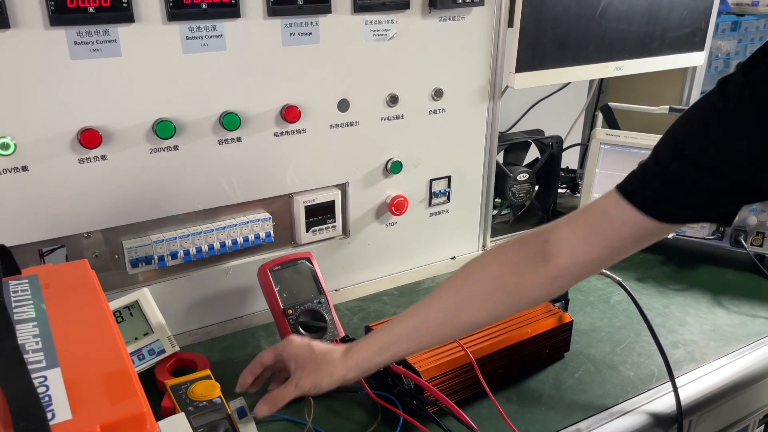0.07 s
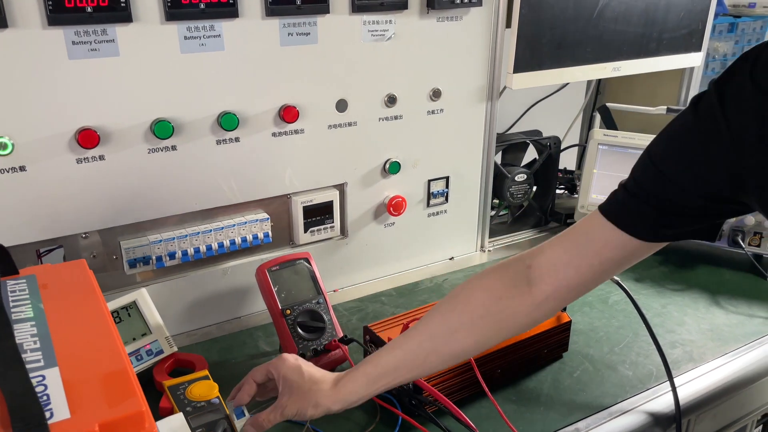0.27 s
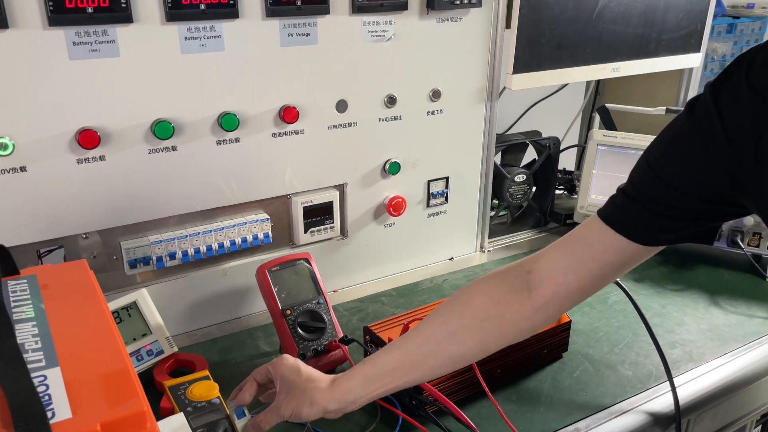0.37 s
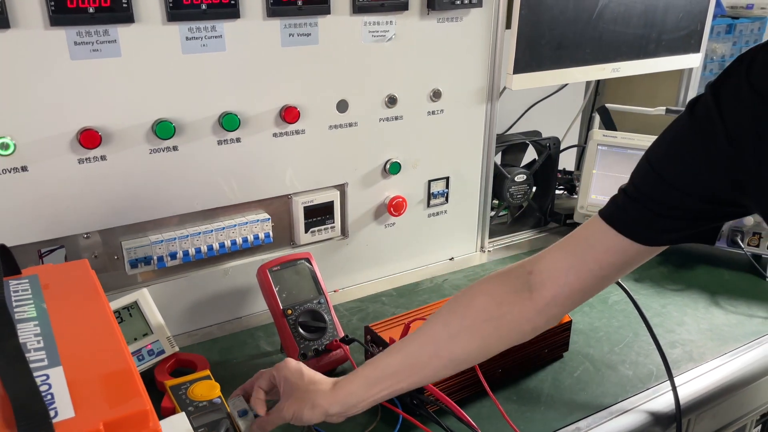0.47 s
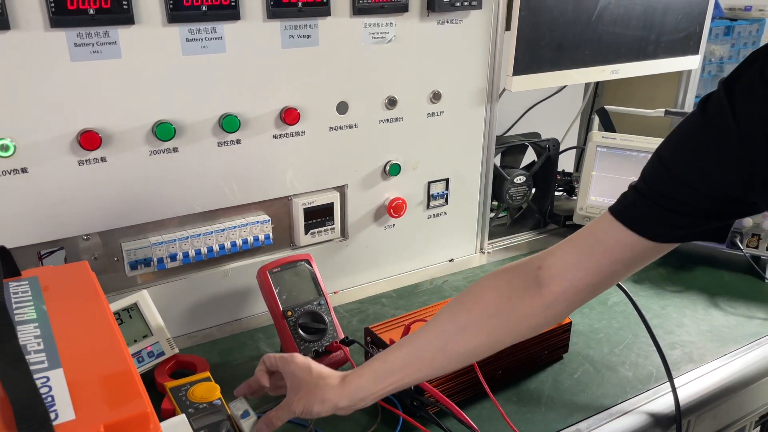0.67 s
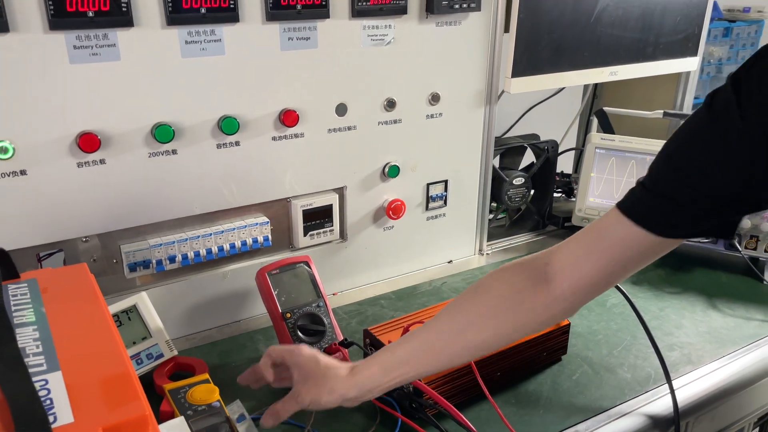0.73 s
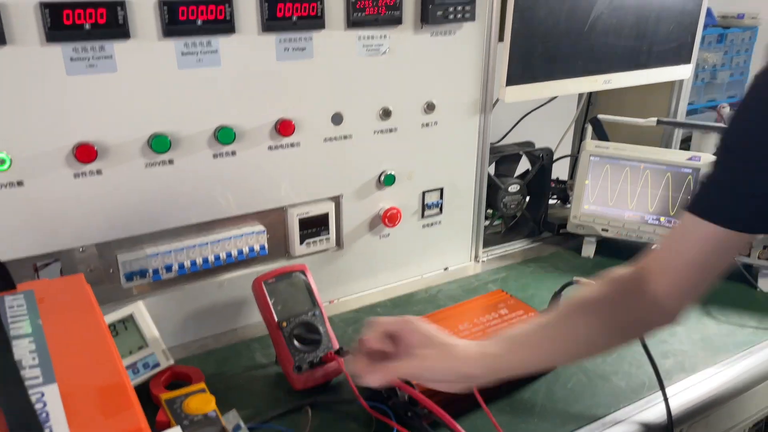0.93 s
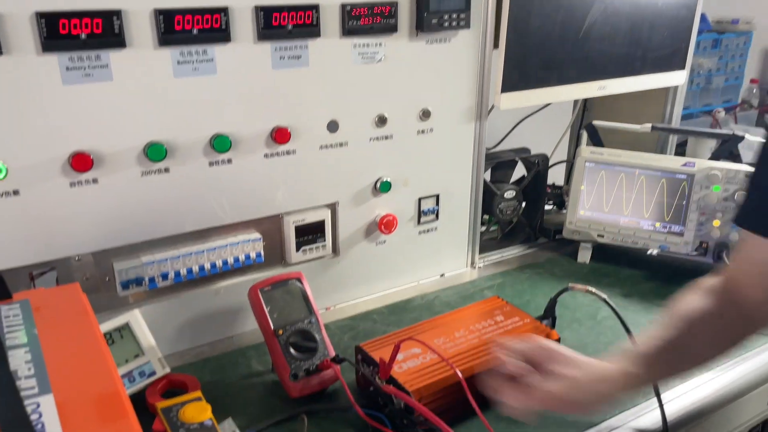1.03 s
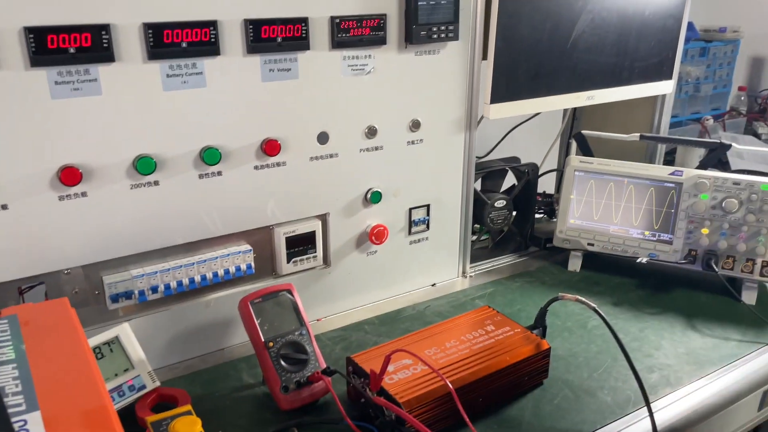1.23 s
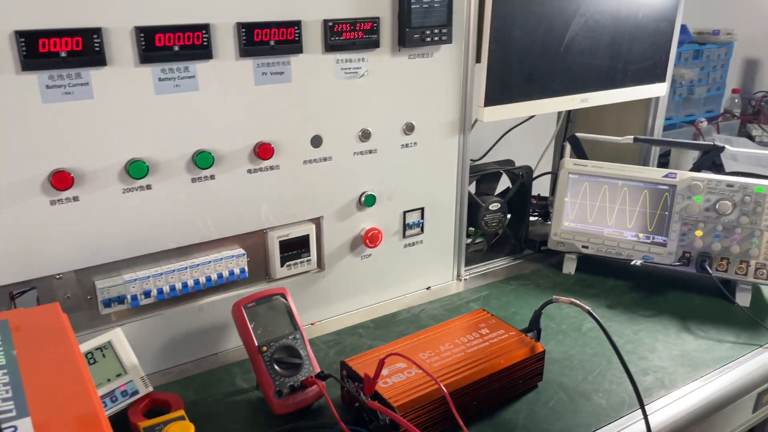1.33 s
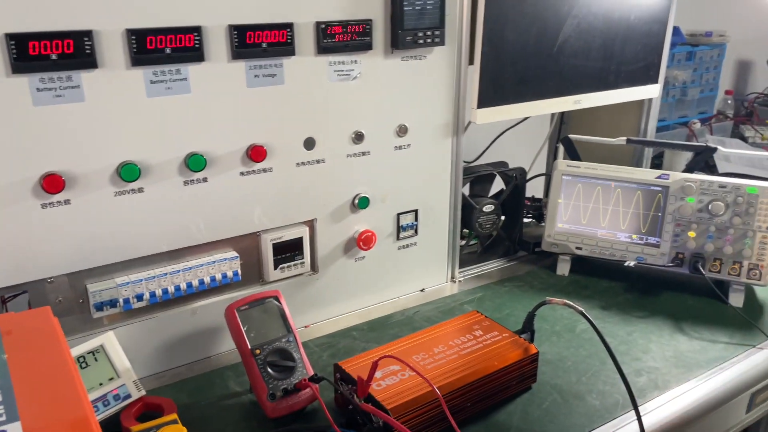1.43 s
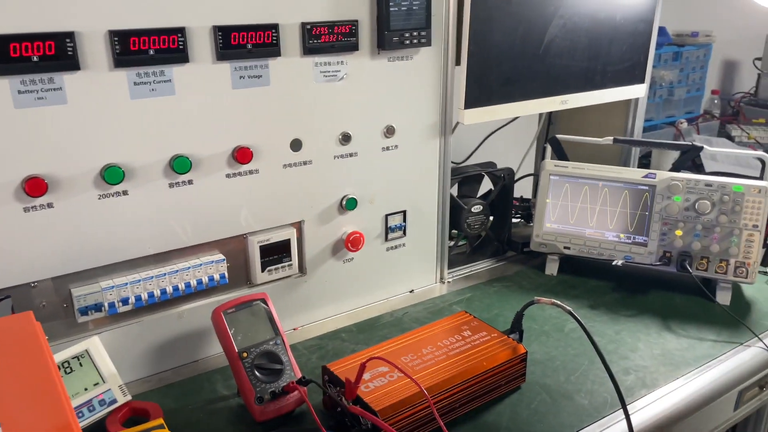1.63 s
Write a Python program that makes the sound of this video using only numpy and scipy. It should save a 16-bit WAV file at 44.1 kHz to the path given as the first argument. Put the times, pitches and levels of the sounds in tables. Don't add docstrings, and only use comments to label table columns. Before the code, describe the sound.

A sharp electrical snap from touching leads cracks over steady humming cooling fans in a workshop

```python
import sys
import numpy as np
from scipy import signal
from scipy.fft import rfft, irfft
from scipy.io import wavfile
from scipy.ndimage import uniform_filter1d

SR = 44100
rng = np.random.default_rng(int(sys.argv[2]) if len(sys.argv) > 2 else 0)


def master_out(mix):
    frames = np.transpose(np.atleast_2d(mix))
    ceiling = np.clip(frames, -1, 1)
    pcm = np.round(ceiling * 32767).astype(np.int16)
    wavfile.write(sys.argv[1], SR, pcm)


def rack_gain(trim_db):
    fader = np.asarray(trim_db, float)
    return 10 ** (fader / 20)


N = 74970


def rms_one(x):
    return x / np.sqrt(np.mean(x ** 2) + 1e-20)


def at_hz(points, hz):
    points = np.array(points)
    return np.interp(np.log(hz), np.log(points[:, 0]), points[:, 1])


def drift(rate_hz):
    hop = 40
    r = np.exp(-2 * np.pi * rate_hz * hop / SR)
    slow = signal.lfilter([1], [1, -2 * r, r * r], rng.standard_normal(N // hop + 2002))
    slow = rms_one(slow[2000:])
    return np.interp(np.arange(N) / hop, np.arange(len(slow)), slow)


def colour(x, spectrum):
    hz = np.maximum(np.fft.rfftfreq(x.shape[-1], 1 / SR), 1)
    inside = (hz > spectrum[0][0]) & (hz < spectrum[-1][0])
    return irfft(rfft(x) * rack_gain(at_hz(spectrum, hz)) * inside, x.shape[-1])


def resonate(x, hz, width_hz):
    r = np.exp(-np.pi * width_hz / SR)
    zeros = (1 - r * r) / 2 * np.array([1, 0, -1])
    poles = [1, -2 * r * np.cos(2 * np.pi * hz / SR), r * r]
    return signal.lfilter(zeros, poles, x + 1e-18)


def in_bands(pair, gain):
    spec = rfft(pair)
    place = 3 * np.log2(np.maximum(np.fft.rfftfreq(N, 1 / SR), 20) / 20)
    out = 0
    for k in range(31):
        band = irfft(spec * np.clip(1 - abs(place - k), 0, 1), N)
        out = out + gain(20 * 2 ** (k / 3)) * band
    return out


def dying(start_s, rise_s, t60_s):
    t = np.maximum(np.arange(N) / SR - start_s, 0)
    return (1 - np.exp(-t / max(rise_s, 1e-4))) * rack_gain(-60 * t / t60_s)


def spread(pair):
    # f/Hz, level/dB
    port_mid = [(500, -26), (900, -4), (2000, -5.74), (6500, -2), (7800, -9.5), (8650, -15.5), (9800, -6.5),
                (13000, -7.5), (15300, 6.5), (16400, -19)]
    # f/Hz, level/dB
    port_side = [(500, -33), (1200, -1.5), (2200, -5.5), (6000, -4), (9000, 0), (11500, -4), (12300, -40),
                 (16400, -40)]
    mid = colour(pair[0], port_mid)
    side = colour(pair[1], port_side)
    return np.array([mid + side, mid - side])


def rush():
    # f/Hz, width/Hz, level/dB
    ducts = [(1181, 11, -1.5), (1944, 33, -6), (2240, 12, -7), (2540, 24, -4), (3630, 33, -13),
             (4060, 140, -8.5), (4480, 45, -4)]
    # f/Hz, density/dB per Hz
    rush_low = [(22, -68), (45, 3.5), (110, -3.24), (260, -1.5), (340, -6.5), (600, -6), (1000, -11),
                (1500, -14.5)]
    # f/Hz, density/dB per Hz
    rush_high = [(1500, 2.5), (3000, -3.5), (5200, -12), (7500, -22), (8000, -27), (9700, -31.5),
                 (10300, -21), (15100, -24.5)]
    # f/Hz, density/dB per Hz
    rush_side = [(30, -15), (350, -5), (800, -2.8), (1100, -5.5), (3000, -16.5), (6000, -27.5),
                 (10500, -30), (12000, -39)]
    low_db, high_db, side_db = -45, -54.5, -49
    white = rng.standard_normal((3, N))
    together = drift(0.53)
    white = white + sum(rack_gain(level_db + 2.5) * resonate(white, hz, width) for hz, width, level_db in ducts)
    mid = rack_gain(low_db) * rms_one(colour(white[0], rush_low))
    mid = mid + rack_gain(high_db) * rms_one(colour(white[1], rush_high))
    side = rack_gain(side_db) * rms_one(colour(white[2], rush_side))

    def patchy(hz):
        return rack_gain(0.078 * together + 0.76 * drift(13.4))

    mid, side = in_bands(np.array([mid, side]), patchy)
    return np.array([mid + side, mid - side])


def blade_tones():
    # multiple, level/dB rms, left-right/dB, left lead/rad, level wander/dB
    tones = [
        (1, -48, 8, 0.34, 1.0),
        (2, -47.5, -0.2, .65, 2.2),
        (3, -67.5, 12.5, 0.77, 0.5),
    ]
    # f/Hz, width/Hz, level/dB rms, left-right/dB
    hums = [(471.7, 11.3, -52, -2), (582, 30, -68, 7), (622.2, 23.5, -58, 8), (792.6, 36, -68, 2),
            (119.3, 6.7, -57.5, 0.5), (254, 17.7, -58.5, 4.5)]
    # t/s, tone gain/dB
    turn_away = [
        (0, 3.05),
        (.9, 2.75),
        (1.25, -0.5),
        (1.7, 0.5),
    ]
    blade_hz, wander_hz = 429.4, 0.65
    out, sides = 0, np.array([[.5], [-.5]])
    phase = 2 * np.pi * np.cumsum(blade_hz + wander_hz * drift(4.6)) / SR
    for multiple, level_db, pan_db, lead, wander_db in tones:
        gain = np.sqrt(2) * rack_gain(level_db + wander_db * drift(9) + pan_db * sides)
        start = rng.uniform(0, 2 * np.pi)
        out = out + gain * np.sin(round(multiple) * phase + start + lead * sides)
    for hz, width, level_db, pan_db in hums:
        hum = resonate(rng.standard_normal(N + SR), hz, width)
        hum = resonate(hum, hz, 3 * width)[SR:]
        out = out + rack_gain(level_db + pan_db * sides) * rms_one(hum)
    return out * rack_gain(np.interp(np.arange(N) / SR, *np.transpose(turn_away)))


def high_pass(x, hz):
    return signal.sosfilt(signal.butter(3, hz, "high", fs=SR, output="sos"), x + 1e-18)


def ticks():
    # t/s, tick level/dB, rustle level/dB, rustle t60/s, lowest f/Hz
    wire_moves = [
        (.172, -64, -57, .3, 9000),
        (.658, -63, -36.5, 0.2, 10700),
        (1.385, -38, -43, 0.28, 2210),
        (1.5553, -39, -49, 0.33, 7860),
    ]
    # f/Hz, density/dB per Hz
    tick_colour = [(1500, -20), (3000, 6), (5500, -5), (6500, 2), (7500, -1), (12000, -4), (16400, -20)]
    click_t60_s, click_low_hz = .012, 6000
    out = 0
    for s, tick_db, rustle_db, t60, low_hz in wire_moves:
        white = rms_one(colour(rng.standard_normal((2, N)), tick_colour))
        click = white * rack_gain(tick_db) * dying(s, 0.00028, click_t60_s)
        rustle = white * rack_gain(rustle_db) * dying(s, 0.0074, t60)
        out = out + high_pass(click, max(low_hz, click_low_hz)) + high_pass(rustle, low_hz)
    return spread(out)


def echo():
    # f/Hz, width/Hz, level/dB
    contact_rings = [(1420, 120, -2.5), (2094, 320, 2.5), (2975, 260, -4), (3840, 71, -4), (4040, 63, -6),
                     (4730, 210, -6.5), (5060, 36, -10), (5480, 43, -38), (6400, 350, -1)]
    # f/Hz, density/dB per Hz
    echo_colour = [(600, 20.5), (1200, -1.5), (2000, 0), (4500, -0.5), (6500, -5.5), (9000, 0.5),
                   (13000, 9), (16400, -19)]
    # f/Hz, t60/s
    room_t60 = [(1000, 0.15), (2000, 0.89), (4000, 0.89), (6000, 0.89), (9000, 0.5), (14000, 0.5)]
    start_s = .438
    early_db, early_t60_s, late_db = -13, 0.17, -26
    white = rng.standard_normal((2, N))
    white = white + sum(rack_gain(level_db + 10) * resonate(white, hz, width) for hz, width, level_db in contact_rings)
    early = rack_gain(early_db) * dying(start_s, 0.00067, early_t60_s)

    def early_and_late(hz):
        late = rack_gain(late_db + 0.66 * drift(40)) * dying(start_s, 0.0073, at_hz(room_t60, hz))
        return np.hypot(early, late)

    return spread(in_bands(rms_one(colour(white, echo_colour)), early_and_late))


def thuds():
    # t/s, peak level/dB, f/Hz, t60/s
    bench_modes = [
        (0.438, -25, 160, 0.047),
        (0.446, -18, 352, 0.024),
        (.467, -21.5, 400, 0.027),
        (0.4751, -16, 173, 0.022),
        (0.486, -36, 90, 0.076),
    ]
    t = np.arange(N) / SR
    out = 0
    for s, peak_db, hz, t60 in bench_modes:
        push = rack_gain(peak_db + 9.5) * dying(s, .005, t60)
        out = out - push * np.sin(2 * np.pi * hz * (t - s))
    return out


def sizzle():
    start_s, end_s = .420, .434
    whine_hz, width_hz, level_db = 5900, 250, -31
    t = np.arange(N) / SR
    whine = rms_one(resonate(rng.standard_normal((2, N)), whine_hz, width_hz))
    grow = np.clip((t - start_s) / (end_s - start_s), 0, 1) * (t < end_s + .001)
    mid_side = rack_gain(np.array([[-5], [0.1]]))
    return rack_gain(level_db) * grow * spread(whine * mid_side)


def arc():
    # t/s, peak level/dB, ring f/Hz, ring level/dB
    bursts = [
        (.4334, -22, 5900, -4),
        (.4350, -5, 12500, 1),
        (.4354, -11, 2010, 4),
        (.4350, -20, 1380, 6),
        (.4363, -13, 4580, 2),
        (.4369, -13, 2970, 5),
        (.4376, -12, 3610, 4),
        (.4386, -14, 5000, 3),
        (.4395, -15, 2010, 2),
        (.4406, -20, 4100, 3),
    ]
    crackles, burst_s, ring_t60_s = 4, .0004, 0.013
    level_db, top_side_db = 6.5, -10
    out = np.zeros((2, N))
    t = np.arange(1200) / SR
    for s, peak_db, hz, ring_db in bursts:
        at = ((s + burst_s * rng.random((2, crackles))) * SR).astype(int)
        strength = rack_gain(peak_db + rng.normal(0, 2, at.shape))
        out[[[0], [1]], at] += strength * rng.choice([-1, 1], at.shape)
        offset = rng.uniform(-1.6, 1.6) * np.array([[0], [1]])
        phase = 2 * np.pi * hz * t + rng.uniform(0, 2 * np.pi) + offset
        ring = np.sin(phase) * rack_gain(-60 * t / ring_t60_s)
        first = int(s * SR)
        out[:, first:first + len(t)] += rack_gain(peak_db + ring_db - 7) * ring
    top = rack_gain(top_side_db) * colour(out[1], [(11800, -3), (14500, .1), (16400, -9)])
    return rack_gain(level_db) * (spread(out) + top * [[1], [-1]])


def scene():
    left_db = 0.64
    balanced = rush() + ticks() + echo() + thuds() + sizzle() + arc()
    return blade_tones() + balanced * rack_gain(np.array([[left_db], [-left_db]]))


def roll_off(x):
    return signal.sosfilt(signal.butter(12, 16470, fs=SR, output="sos"), x)


def record(dry):
    start_db, share, release_db_per_s = -28, .3, 250
    level_db = 10 * np.log10(uniform_filter1d(np.mean(dry ** 2, axis=0), size=128) + 1e-12)
    ramp = release_db_per_s * np.arange(N) / SR
    held_db = np.maximum.accumulate(level_db + ramp) - ramp
    wanted_db = -share * np.maximum(held_db - start_db, 0)
    cut_db = signal.lfilter([.004], [1, -.996], wanted_db)
    low_pass = signal.cheby2(12, 60, 16400, fs=SR, output="sos")
    mix = signal.sosfilt(low_pass, dry * rack_gain(cut_db))
    return roll_off(mix)


dry = scene()
out = record(dry)
master_out(out)
```